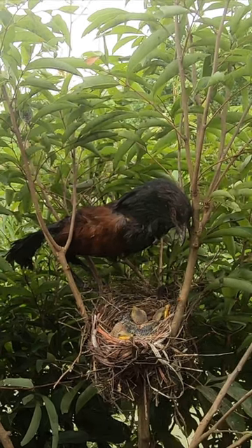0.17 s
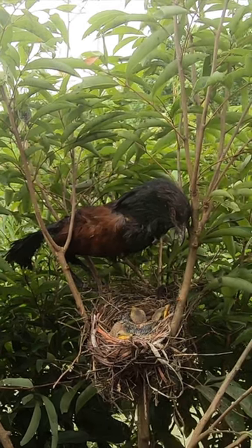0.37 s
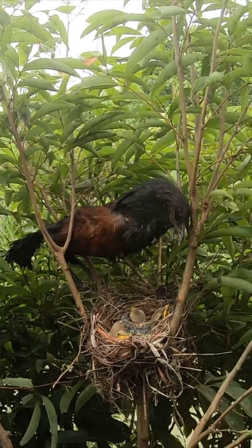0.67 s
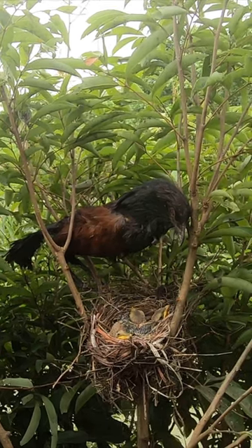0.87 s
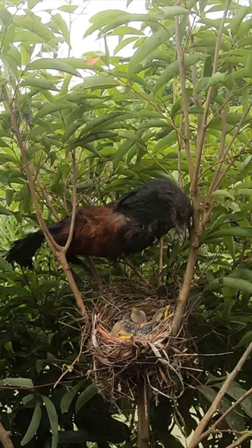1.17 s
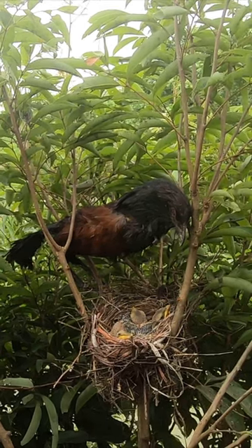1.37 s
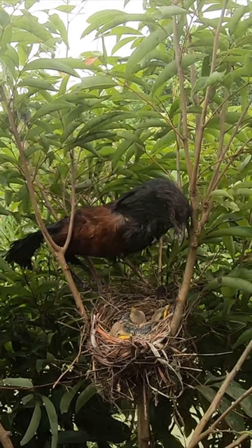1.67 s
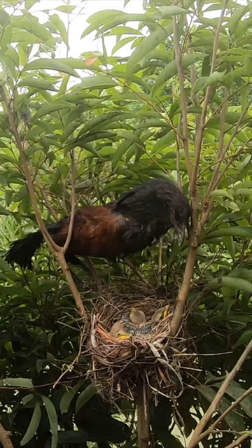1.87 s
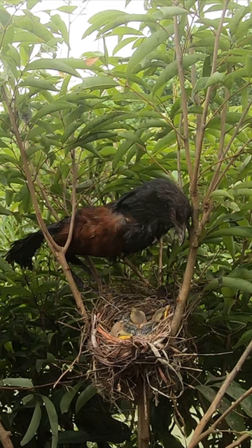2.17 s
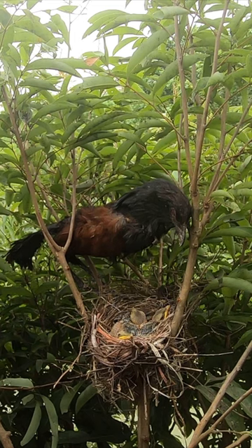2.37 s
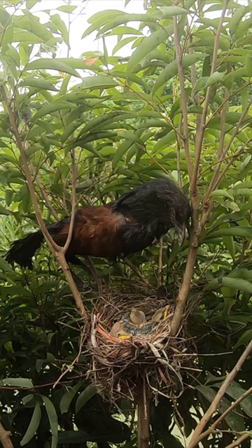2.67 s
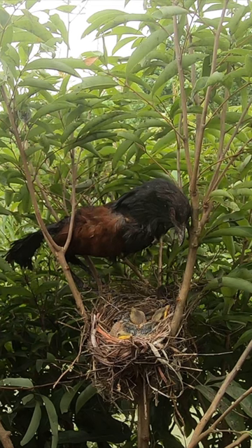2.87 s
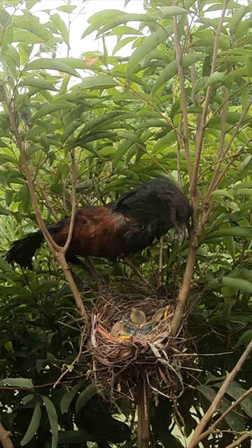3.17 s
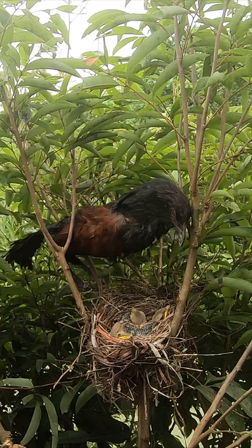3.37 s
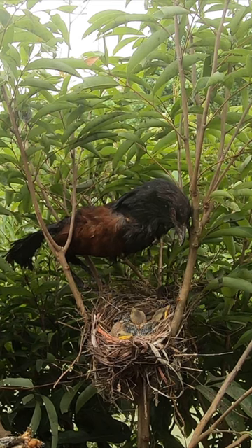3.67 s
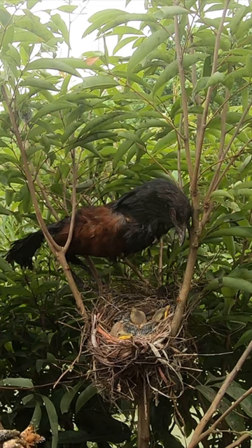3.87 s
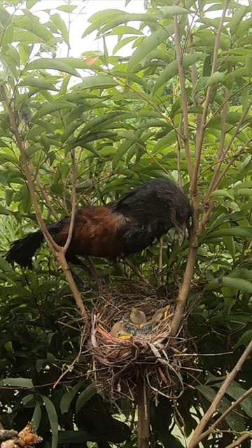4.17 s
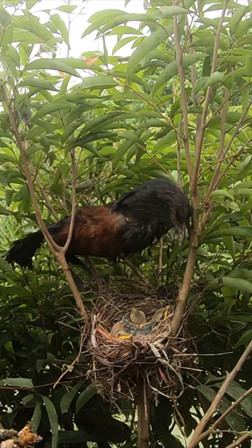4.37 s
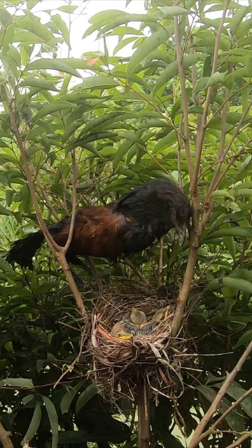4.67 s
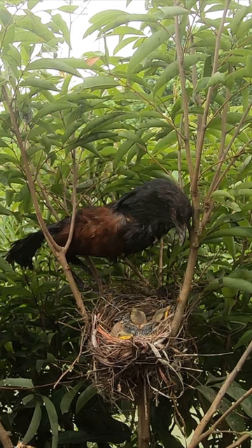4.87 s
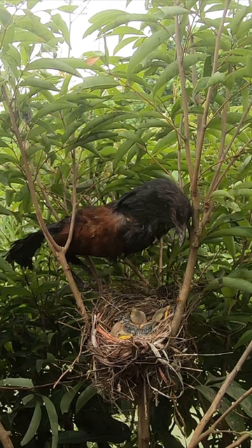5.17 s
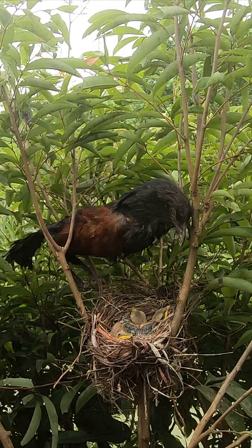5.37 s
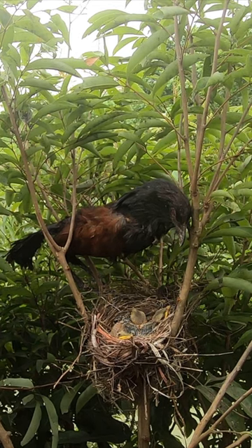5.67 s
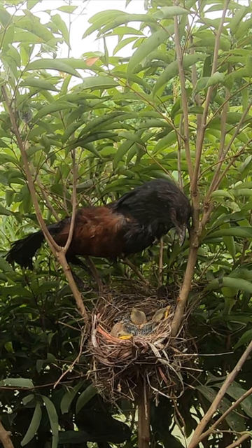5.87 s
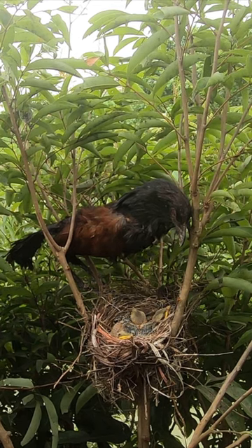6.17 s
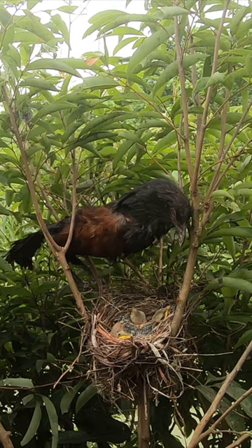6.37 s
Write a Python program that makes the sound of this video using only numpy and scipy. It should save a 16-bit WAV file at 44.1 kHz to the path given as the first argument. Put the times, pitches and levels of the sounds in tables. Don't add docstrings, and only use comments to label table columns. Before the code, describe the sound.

Outdoors among leaves, a bird scolds close to the microphone from the very start. A very short rasp at 0 s is followed by a longer one at 0.3 s, then harsh calls at about 0.8, 1.2, 1.7, 2.2, 2.6 and 3.0 s, continuing every 0.4 s to the end near 6.5 s. Each is a dry, toneless rattle chopped about a hundred times a second, bright and hissy, starting with a snap and stopping abruptly; small head turns dull it momentarily. The image is narrow until about 1.5 s, then widens to stereo. Around 1.8 s a distant engine hums up, a deep wavering rumble with low roar. A thin whine swells near 3.6 s and 5.5 s, with brief gear tones from 2.7 to 3.5 s. The hum dips near 6.1 s and returns. Faint air hush and a soft leaf brush at 4.7 s sit underneath.

```python
import sys
import numpy as np
from scipy import signal
from scipy.fft import rfft, irfft, next_fast_len
from scipy.io import wavfile
from scipy.ndimage import uniform_filter1d

SR = 44100
rng = np.random.default_rng(int(sys.argv[2]) if len(sys.argv) > 2 else 0)


def gain_from_decibels(decibels):
    exponent = np.asarray(decibels, float) / 20
    return 10 ** exponent


def wav_record(signal):
    frames = np.transpose(np.atleast_2d(signal))
    bounded = np.clip(frames, -1, 1)
    quanta = np.round(bounded * 32767).astype(np.int16)
    wavfile.write(sys.argv[1], SR, quanta)


N = 287973


def evened(x):
    return x / np.sqrt(np.mean(x ** 2) + 1e-20)


def curves(rows, t):
    s, *columns = np.transpose(rows)
    return [np.interp(t, s, c) for c in columns]


def wander(count, smooth):
    return evened(uniform_filter1d(uniform_filter1d(rng.standard_normal(count), smooth), smooth))


def coloured(points):
    size = next_fast_len(N, True)
    hz = np.fft.rfftfreq(size, 1 / SR)
    (db,) = curves([(np.log(f), v) for f, v in points], np.log(hz + 1))
    db[hz < points[0][0]] = -120
    return evened(irfft(rfft(rng.standard_normal(size)) * gain_from_decibels(db), size)[:N])


def resonate(x, hz, width_hz):
    turn = np.exp(2j * np.pi * np.cumsum(hz * np.ones(len(x))) / SR)
    r = np.exp(-np.pi * width_hz / SR)
    slow = signal.lfilter([(1 - r) ** 2], [1, -2 * r, r * r], x * turn.conj() + 1e-18)
    return 2 * (turn * slow).real


def bumps(rows, t, power=2):
    return sum(gain_from_decibels(db) * np.exp(-((t - s) / width_s) ** power) for s, db, width_s in rows)


def phase(hz):
    return 2 * np.pi * np.cumsum(hz) / SR


def effort_curve(age, length_s, final_db, swell_db, fresh):
    before_s = np.minimum(age, 0)
    snap_db = -13 * (before_s / 0.00083) ** 2
    faint_air_db = -18.5 + 702 * before_s
    attack_db = -13 * fading(age, 0.024, fresh) + np.maximum(snap_db, faint_air_db) * fresh
    swell_db = -swell_db * np.maximum(1 - age / length_s, 0)
    return final_db + swell_db + attack_db + RELEASE_DB_PER_S * np.maximum(age - length_s, 0)


def fading(age, tau_s, fresh):
    return np.exp(-np.maximum(age, 0) / tau_s) * fresh


def chop(age, rate_hz, rise_hz_per_s, fresh):
    since = age + 0.001
    size = len(age)
    cycle = rate_hz * since + rise_hz_per_s * since ** 2 / 2 + .02 * wander(size, 400)
    depth_db = 3.3 + 6 * np.exp(-(age - age[0]) / .1) * fresh
    depth_db *= (age > -.004) | (not fresh)
    wave = np.cos(2 * np.pi * cycle) + 0.083 * np.sin(4 * np.pi * cycle)
    gate = gain_from_decibels(depth_db * wave + .5 * wander(size, 200))
    return cycle, gate / np.sqrt(uniform_filter1d(gate ** 2, 900, mode="nearest"))


def voice_box(cycle, throat_hz, breath):
    size, rough = len(cycle), .38
    glide = 1 + .05 * np.sin(2 * np.pi * cycle) + .095 * wander(size, 60)
    turns = np.cumsum(880 * throat_hz / 4380 * glide) / SR
    clicks = np.diff(np.floor(turns), prepend=0) * gain_from_decibels(2.0 * rng.standard_normal(size))
    return (1 - rough) * evened(clicks - clicks.mean()) + rough * breath


def chest_thump(cycle, gate, breath):
    clean = 0.36
    beats = evened(sum(np.cos(2 * np.pi * k * cycle - 0.2505 * k * k) for k in range(3, 13)))
    return clean * beats + (1 - clean) * gate * breath


# f/Hz, width/Hz, level/dB
THROAT_RINGS = [(2500, 448, -1), (4414, 770, 0.5), (4975, 330, -7), (5434, 320, -8)]
MIDDLE_RINGS = [(3267, 980, 0)]
GULLET_RINGS = [(1480, 470, -2.5), (1949, 266, -2)]
BEAK_RINGS = [(6180, 510, 4.5), (7020, 870, 13), (7170, 580, -2), (8390, 4500, -25)]


def airway(gate, buzz, thump, breath, throat_hz, middle_db, bright_db, rush_db, gape):
    def opened(shut, wide):
        return shut + (wide - shut) * gape

    drive, other = gate * buzz, gate * buzz[::-1]
    hiss = np.sqrt(gate) * breath
    flutter = 1 + .016 * wander(len(gate), 150)
    shift = throat_hz / 4380
    chest_hz = 584 + (860 - 584) * gape ** 2
    edge_db = np.interp(gape, [0, 0.25], [-32.5, 2.5])
    parts = [(drive, THROAT_RINGS, shift, -1.5),
             (other, MIDDLE_RINGS, 1, middle_db),
             (other, GULLET_RINGS, shift, opened(-17.5, -14)),
             (drive, BEAK_RINGS, 1, bright_db),
             (thump, [(chest_hz, 400, 0)], 1, -21.5),
             (hiss, [(11870, 1500, 0)], 1, rush_db - 2.5),
             (hiss, [(9640, 2500, 0)], 1, rush_db + edge_db),
             (hiss, [(13470, 1100, -7.5), (14500, 1000, -12)], 1, rush_db + opened(-29.5, 2)),
             (drive, [(4995, 449, 0)], 1, opened(-11, -22)),
             (drive, [(5748, 598.5, 0)], 1, opened(-30, -9))]
    out = 0
    for source, modes, stretch, db in parts:
        ring = sum(gain_from_decibels(g) * resonate(source, f * stretch * flutter, w) for f, w, g in modes)
        band_hz = [.6 * modes[0][0], modes[-1][0] + 700]
        steep = signal.butter(4, band_hz, "band", fs=SR, output="sos")
        out = out + gain_from_decibels(db) * evened(signal.sosfilt(steep, ring))
    return out


RELEASE_DB_PER_S, RELEASE_S = -850, .055


def rasp(effort, chops, pose):
    length_s, final_db, swell_db = effort
    first_s, rate_hz, rise_hz_per_s = chops
    throat_hz, middle_db, facing_db, rush_db, gape = pose
    t = np.arange(max(first_s - .025, 0), first_s + length_s + RELEASE_S, 1 / SR)
    age, fresh = t - first_s, t[0] > 0
    over_s = np.maximum(age - length_s, 0)
    flick = flick_amount(t)
    throat_hz = throat_hz * (1 - 0.025 * over_s / RELEASE_S) * (1 - .07 * flick)
    late = fading(age, 0.011, fresh)
    bright_db = facing_db - 7.5 * late
    middle_db = middle_db - 4.5 * late
    rush_db = rush_db - 15.5 * late + 3.5 * flick
    rush_db -= 0.44 * RELEASE_DB_PER_S * over_s
    cycle, gate = chop(age, rate_hz, rise_hz_per_s, fresh)
    breath = rng.standard_normal(len(t))
    buzz = voice_box(cycle, throat_hz, breath)
    thump = chest_thump(cycle, gate, breath)
    voice = airway(gate, buzz, thump, breath, throat_hz, middle_db, bright_db, rush_db, gape)
    return round(t[0] * SR), gain_from_decibels(effort_curve(age, length_s, final_db, swell_db, fresh)) * voice


# t/s, f/Hz, width/Hz, length/s, level/dB
FLICKS = [
    (0.963, 7200, 1320, 0.031, -6),
    (1.127, 4800, 1233, 0.022, -14),
    (1.283, 6440, 1530, 0.021, -12),
    (1.754, 5700, 1480, 0.0159, -4),
    (1.875, 5940, 1660, 0.0203, -9),
    (2.238, 6210, 1510, .015, -15.5),
    (2.33, 4800, 1497, 0.02, -12.5),
    (3.255, 4400, 880, 0.02334, -19),
    (4.96, 5700, 1480, .015, -12),
    (5.253, 4560, 1000, 0.064, -18),
]


def flick_amount(t):
    return sum(np.exp(-((t - s) / length_s) ** 2) for s, f, w, length_s, db in FLICKS)


def flicked(x):
    hz, t, z = signal.stft(x, SR, nperseg=256)
    shade_db = 0
    for s, f, width_hz, length_s, db in FLICKS:
        shade_db = shade_db + db * np.exp(-((hz[:, None] - f) / width_hz) ** 2 - ((t - s) / length_s) ** 2)
    return signal.istft(z * gain_from_decibels(shade_db), SR, nperseg=256)[1][:N]


# length to release/s, final level/dB, swell/dB
EFFORTS = [(0.084, -27, 1), (0.4174, -23, 11), (0.323, -30, 0.5), (0.3057, -29, 4), (0.3421, -27.5, 3.5),
           (.31, -24, 6.5), (0.23, -25, 3.5), (0.29, -26.5, 3.5), (0.2738, -24.5, 2.5), (0.28, -24, 3),
           (0.28, -23.5, 6.5), (0.3098, -24.5, 5), (0.19, -26, 8.5), (0.2185, -26, 4), (0.2722, -23, 6.5),
           (.26, -24, 3.5)]
# first burst t/s, rate/Hz, rate rise/(Hz/s)
CHOPS = [(0.0043, 115.0, 5), (0.2608, 111.0, 12), (0.8104, 104.5, 12), (1.2275, 104.5, 30),
         (1.6692, 100.5, 28), (2.1572, 99.6, 30), (2.5999, 98.5, 55), (3.0207, 100.6, 21),
         (3.4528, 97.7, 46), (3.893, 97.1, 28), (4.3291, 94.3, 57), (4.739, 97.6, 24), (5.1752, 94.8, 51),
         (5.5095, 91.0, 73), (5.9012, 96.0, 35), (6.3319, 94.6, 30)]
# throat f/Hz, middle ring level/dB, beak facing level/dB, air rush level/dB, gape/0-1
POSES = [(4355, -14, -3.5, -28.5, .95), (4250, -13, -4, -31, 0.98), (3935, -8, -4, -32.5, 0.99),
         (4320, -6.5, -3, -32, 1), (4150, -4.5, -8, -26, 0.88), (4250, -6, -8.5, -26.5, 0.7),
         (4485, -4.5, -5.5, -25.5, .3), (4440, -4.5, -5.5, -24.5, 0.57), (4190, -4.5, -10.5, -26.5, .4),
         (4287, -4.5, -9, -24.5, 0.26), (4270, -4, -10, -27, 0.29), (4520, -4.5, -6, -23.5, 0.58),
         (4350, -7, -8.5, -28, .3), (4350, -5, -7.5, -29.5, 0.2), (4255, -5, -6.5, -31.5, 0.11),
         (4365, -3.5, -6, -32, 0.2)]


def bird():
    dry = np.zeros(N)
    for call in zip(EFFORTS, CHOPS, POSES):
        at, sound = rasp(*call)
        dry[at:at + len(sound)] += sound[:N - at]
    return at_ports(flicked(dry))


# f/Hz, left-right level/dB, right lead/rad, likeness/0-1
PORTS = [(316, -11, 3, 1), (704, -3.5, 2, 0.77), (1190, 0.5, 1.26, 1), (2000, 2, -0.35, 0.91),
         (2487, -8, 2.08, 1), (2954, -2.5, -2.9, 1), (3280, -7, -1, 0.99), (4300, -2, 0.66, 0.97),
         (4900, 2, 1.23, 0.92), (6780, -10.5, 1, 0.98), (7200, 11, 4, 0.99), (9220, -4.5, 8, 1),
         (9900, -3.5, 8, 0.8), (15000, 5.5, 7.5, 0.8)]


def at_ports(dry):
    balance_db, lead, same = curves(PORTS, np.fft.rfftfreq(512, 1 / SR))
    gain = np.array([gain_from_decibels(balance_db), np.ones(257)]) * np.sqrt(2 / (1 + gain_from_decibels(2 * balance_db)))
    shared = gain * np.array([same * np.exp(-.5j * lead), np.exp(.5j * lead)])
    own = gain[0] * np.sqrt(1 - same ** 2)
    analytic = signal.hilbert(dry, next_fast_len(N))[:N]
    scrambled = (analytic * np.exp(2j * wander(N, 250))).real

    def impulse(z):
        return np.roll(irfft(z), 256, -1) * np.hanning(512)

    out = signal.oaconvolve(dry[None], impulse(shared), axes=1)[:, 256:256 + N]
    out[0] += signal.oaconvolve(scrambled, impulse(own))[256:256 + N]
    tails = np.array([scatter(0.5, 0.0037) for _ in range(2)])
    return out + gain_from_decibels(-37) * signal.oaconvolve(dry[None], tails, axes=1)[:, :N]


def scatter(t60_s, start_s):
    t = np.arange(round(.3 * SR)) / SR
    hits = rng.choice([-1., 1.], len(t)) * (rng.random(len(t)) < .08)
    taps = hits * (t > start_s) * gain_from_decibels(-60 * t / t60_s)
    return taps / np.linalg.norm(taps)


def engine():
    t = np.arange(N) / SR
    low = firing(t) + roar(t)
    return low * gain_from_decibels([[-3.0], [2.2]]) + (whine(t) + gears(t)) * gain_from_decibels([[-9], [4]])


# t/s, level/dB
LOAD = [(0.0, -47.5), (0.71, -45.5), (1.29, -49.5), (1.76, -25.5), (1.85, -33.5), (1.93, -22.5),
        (2.18, -27.5), (2.71, -24.5), (2.78, -20), (4.11, -22.5), (4.95, -19.5), (5.04, -25), (5.11, -19.5),
        (6.02, -28), (6.07, -42), (6.18, -24.5), (6.42, -24), (6.53, -26.5)]


def load(t):
    (db,) = curves(LOAD, t)
    settle_s, full_db = 0.95, -21.5
    return db, uniform_filter1d(db, round(settle_s * SR), mode="nearest") - full_db


def firing(t):
    db, settled_db = load(t)
    hz = 53.2 * (1 + .02 * wander(N, 3000))
    waver_db = (1.3 - 0.15 * settled_db) * wander(N, 2400)
    hum = np.sqrt(2) * gain_from_decibels(db + waver_db) * np.sin(phase(hz))
    throb_db = -38 + .5 * settled_db + 3.0 * wander(N, 8000)
    return hum + gain_from_decibels(throb_db) * evened(resonate(rng.standard_normal(N), hz / 2, 12))


# f/Hz, level/dB per Hz
ROAR_SHAPE = [(36, -6.5), (62, -10), (78, -6), (98, -2), (120, -11), (167, -40), (279, -68), (301, -62.5),
              (320, -37.5), (420, -61), (700, -120)]


def roar(t):
    roar_db = -37.5 + 0.39 * load(t)[1] + 1.67 * (t - 3.5)
    return gain_from_decibels(roar_db) * coloured(ROAR_SHAPE)


# t/s, level/dB, width/s
WHINE_SWELLS = [
    (2.4, -57, .3),
    (3.62, -51, 0.34),
    (4.62, -54.5, .2),
    (5.48, -51.5, 0.058),
    (5.92, -56.5, 0.065),
    (6.29, -60, 0.03),
]


def whine(t):
    switched = 1 / (1 + np.exp((1.82 - t) / 0.019))
    gain = gain_from_decibels(-69) + gain_from_decibels(-58.5) * switched * gain_from_decibels(-8 * np.maximum(t - 4.8, 0))
    gain += bumps(WHINE_SWELLS, t)
    hz = 336 * (1 + 0.0053 * wander(N, 4000))
    haze = evened(resonate(rng.standard_normal(N), hz, 17))
    return gain * (np.sin(phase(hz)) + 0.36 * haze)


# f/Hz, level/dB
GEAR_LINES = [(544, -53.5), (398, -60.5), (480.3, -59.5), (666, -61.5), (793, -65.5)]
# t/s, level/dB, width/s
GEAR_BITES = [
    (2.68, -3, .1),
    (2.97, 1, 0.04),
    (3.15, -3, 0.044),
    (3.43, 1.5, 0.084),
]


def gears(t):
    lines = 0
    for f, db in GEAR_LINES:
        lines = lines + gain_from_decibels(db) * np.sqrt(2) * np.sin(2 * np.pi * f * t + 0.88 * wander(N, 900))
    return bumps(GEAR_BITES, t, 4) * lines


# f/Hz, level/dB per Hz
HUSH_SHAPE = [(110, -12), (150, -16), (230, -25), (400, -31), (700, -36), (1200, -43), (2200, -56),
              (4600, -66), (8500, -68.5), (15000, -100)]
# t/s, level/dB, width/s
LEAF_BRUSHES = [
    (2.961, -68, 0.031),
    (3.401, -63.5, 0.038),
    (4.70, -51, .012),
    (5.13, -60, 0.045),
]


def air():
    t = np.arange(N) / SR
    settled_db = load(t)[1]
    hush_db = -51.5 + 0.11 * settled_db + 2.2 * wander(N, 3000)
    hush = np.array([coloured(HUSH_SHAPE), coloured(HUSH_SHAPE)]) * gain_from_decibels(hush_db) * gain_from_decibels([[-2], [4]])
    wash = evened(resonate(rng.standard_normal(N), 516, 230))
    road = np.array([wash, np.roll(wash, SR)]) * gain_from_decibels(-58 + settled_db)
    dull = evened(resonate(rng.standard_normal(N), 460, 540))
    return hush + road + bumps(LEAF_BRUSHES, t) * dull * gain_from_decibels([[-3], [2.5]])


def scene():
    return bird() + engine() + air()


def thin_treble(x, loud_db, under_db=-47, tilt_db_per_khz=.5):
    hz, t, z = signal.stft(x, SR, nperseg=1024, noverlap=512)
    band_hz = hz[:512:8, None]
    level_db = 10 * np.log10((abs(z[:512].reshape(64, 8, -1)) ** 2).sum(1) + 1e-14)
    bar_db = np.interp(t, np.arange(N) / SR, loud_db) + under_db
    bar_db = bar_db + tilt_db_per_khz * (band_hz - 12000) / 1000
    luck_db = 3 * uniform_filter1d(rng.standard_normal(level_db.shape), 2) * np.sqrt(2)
    keep = 1 / (1 + np.exp(np.clip(2 * (bar_db - level_db + luck_db), -30, 30)))
    z[:512] *= np.repeat(np.where(band_hz < 8300, 1, keep), 8, 0)
    return signal.istft(z, SR, nperseg=1024, noverlap=512)[1][:N]


def band_limit(x):
    return signal.sosfilt(signal.butter(12, 15800, fs=SR, output="sos"), x)


# t/s, share/0-1
OPENING = [
    (1.38, 0),
    (1.62, 1),
]


def record(dry):
    mid, side = (dry[0] + dry[1]) / 2, (dry[0] - dry[1]) / 2
    (share,) = curves(OPENING, np.arange(N) / SR)
    high = signal.oaconvolve(side, signal.firwin(255, 11200, pass_zero=False, fs=SR), "same")
    side = share * side + (1 - share) * high
    loud_db = 10 * np.log10(uniform_filter1d(mid ** 2, 20000) + 1e-12)
    mid, side = thin_treble(mid, loud_db), thin_treble(side, loud_db)
    return band_limit(np.array([mid + side, mid - side]))


dry = scene()
out = record(dry)
wav_record(out)
```